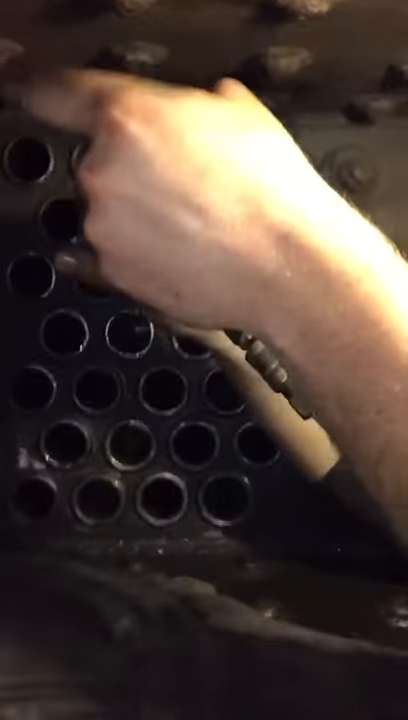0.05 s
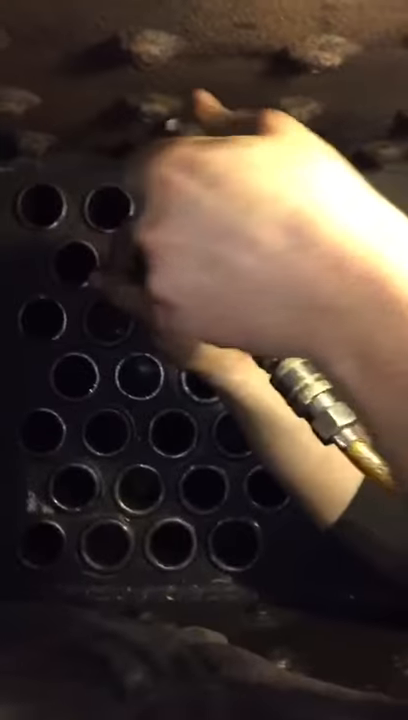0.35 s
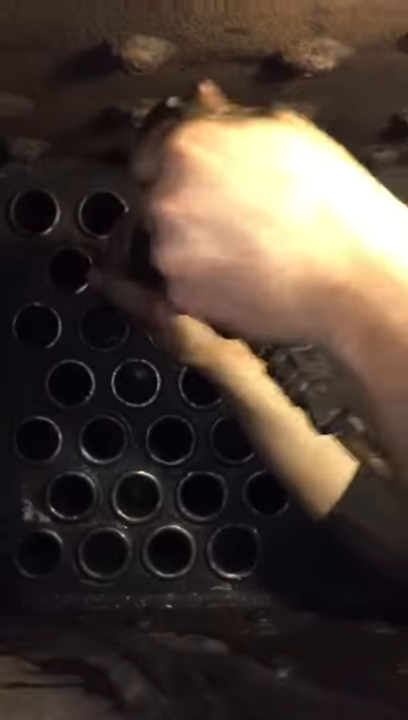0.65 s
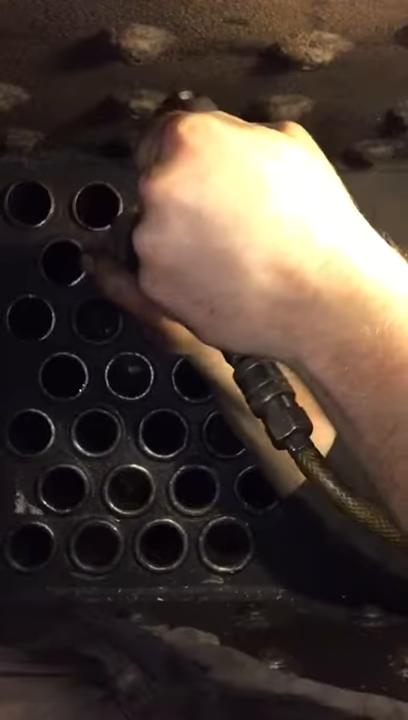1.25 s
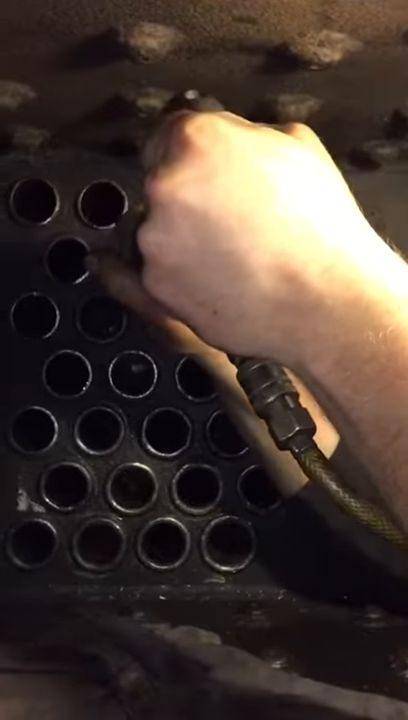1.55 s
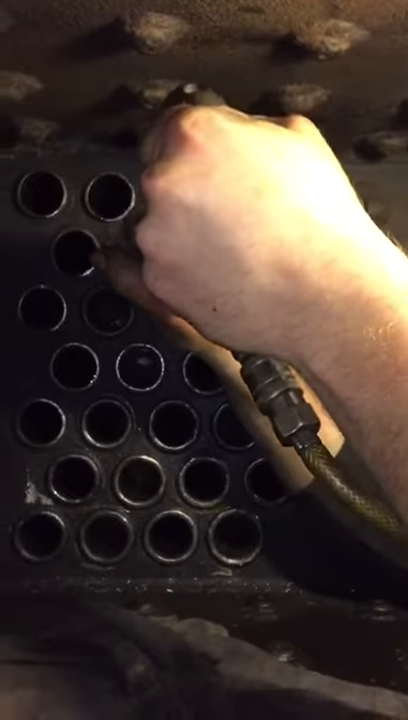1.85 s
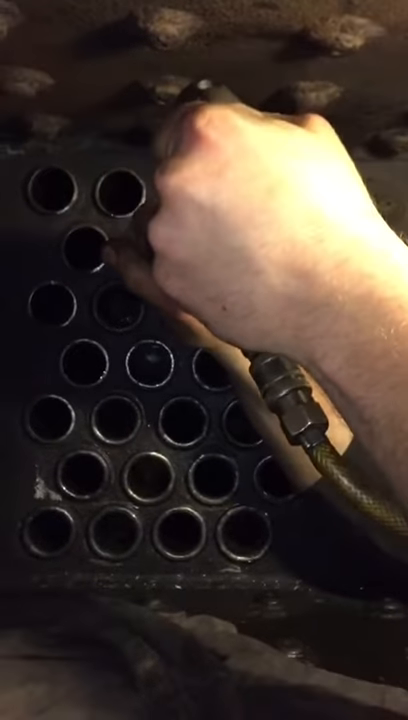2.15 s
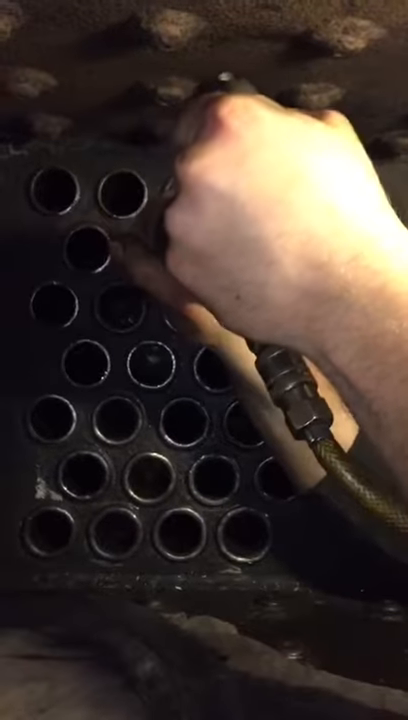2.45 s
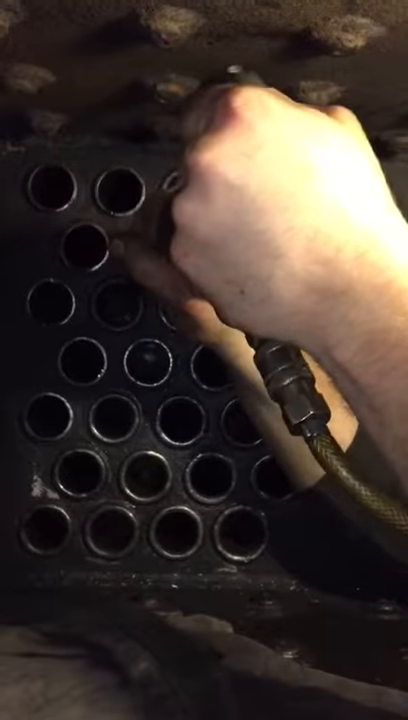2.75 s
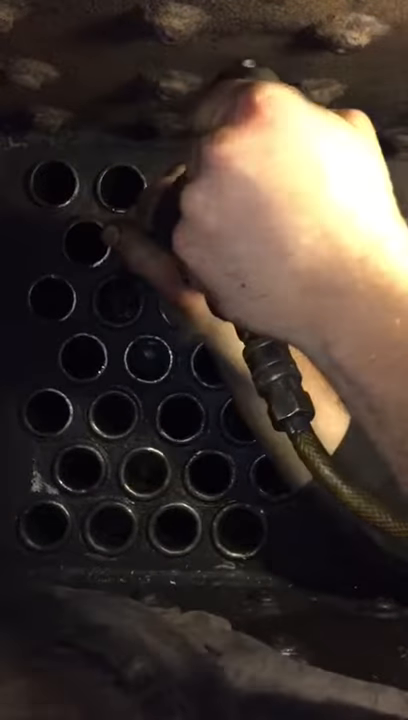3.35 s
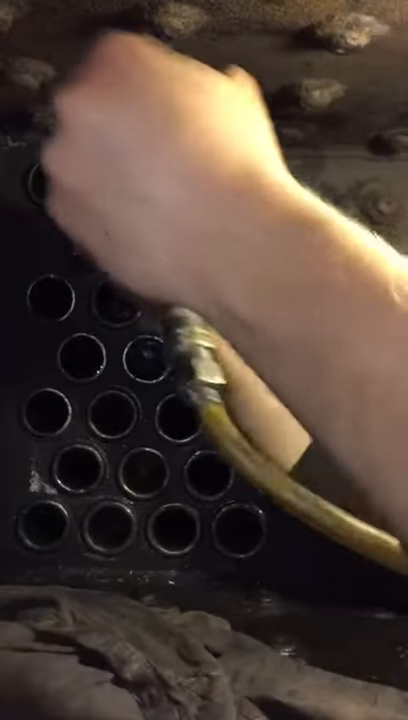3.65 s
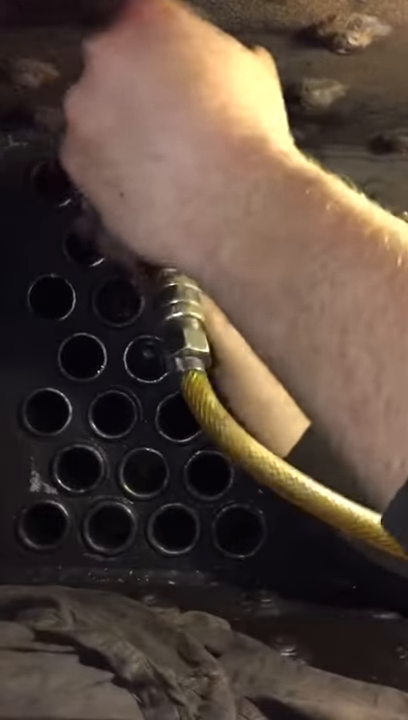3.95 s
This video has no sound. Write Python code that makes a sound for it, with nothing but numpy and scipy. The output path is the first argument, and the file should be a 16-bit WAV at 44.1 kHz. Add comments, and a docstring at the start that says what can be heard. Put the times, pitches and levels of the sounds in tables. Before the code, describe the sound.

A pneumatic hammer strikes a steel plate close by in a workshop. At first a compressor throbs and hisses, with a few light chisel ticks near 0.1 seconds. Air hisses at 1.7 seconds; the hammer stutters from 1.8, then builds to about thirty loud, ringing blows a second. It stops with a clink near 3.5 seconds, and the compressor's hum slowly comes back up.

```python
"""In a workshop, a hand-held pneumatic hammer drives its chisel against a steel tube plate, close by.
The loose chisel ticks as it is set on; the tool stutters, then runs up to about 30 blows a second,
each ringing chisel and plate while exhaust air hisses. A compressor throbs and hisses behind it.
Automatic gain control ducks the compressor under the hammering and slowly lets it back."""
import sys
import numpy as np
from scipy import signal
from scipy.fft import rfft, irfft
from scipy.io import wavfile
from scipy.ndimage import uniform_filter1d, map_coordinates

SR = 44100
rng = np.random.default_rng(int(sys.argv[2]) if len(sys.argv) > 2 else 0)


def dump(signal):
    """Clip the signal to [-1, 1] and save it as 16-bit WAV at the path in sys.argv[1]."""
    limited = np.clip(np.atleast_2d(signal).T, -1, 1)
    pcm = np.round(limited * 32767).astype(np.int16)
    wavfile.write(sys.argv[1], SR, pcm)


N = 176400
TIME_S = np.arange(N) / SR
AGE_S = np.arange(SR // 2) / SR  # time since an impact


def amp(db):
    """Decibels to gain."""
    return 10 ** (np.asarray(db) / 20)


def along(points, hz):
    """Interpolate (freq_hz, value) points on a log axis."""
    freq_hz, values = np.transpose(points)
    return np.interp(np.log(hz + 1), np.log(freq_hz + 1), values)


def wobble(rate_hz):
    """Smooth random curve, rate_hz knots a second."""
    return map_coordinates(rng.standard_normal(2000), [TIME_S * rate_hz + 2], mode="wrap")


def noise(spectrum, size=len(AGE_S)):
    """Coloured noise of rms 1."""
    gain = amp(along(spectrum, np.fft.rfftfreq(size, 1 / SR)))
    x = irfft(rfft(rng.standard_normal(size)) * gain, size)
    return x / x.std()


def fade(t60_s, attack_s):
    """Quick rise, exponential fall."""
    return np.exp(-np.log(1000) * AGE_S / t60_s) * (1 - np.exp(-AGE_S / attack_s))


def ring(modes, attack_s, scatter_db, detune, rough):
    """Modes struck once, level and pitch scattered; rough makes their phase wander."""
    out = np.zeros(len(AGE_S))
    for freq_hz, level_db, t60_s in modes:
        envelope = amp(level_db + scatter_db * rng.normal()) * fade(t60_s, attack_s)
        pitch_hz = freq_hz * (1 + detune * rng.normal())
        wander = rough * np.cumsum(rng.standard_normal(len(AGE_S))) / np.sqrt(SR)
        out += envelope * np.sin(2 * np.pi * (pitch_hz * AGE_S + wander))
    return out


def add(track, start_s, sound):
    """Mix a sound in at start_s."""
    part = track[round(start_s * SR):][:len(sound)]
    part += sound[:len(part)]


# room decay: freq_hz, t60_s
ROOM_DECAY = [(100, 0.48), (1000, 0.45), (2500, 0.56), (3800, 0.5), (5300, 0.38), (10000, 0.16)]

def workshop_reverb(x):
    """Diffuse reflections; the high treble dies first."""
    freq_hz, age_s, bands = signal.stft(rng.standard_normal(SR), SR, nperseg=256)
    decay = np.exp(-np.log(1000) * age_s / along(ROOM_DECAY, freq_hz)[:, None])
    tail = signal.istft(bands * decay, SR, nperseg=256)[1]
    return signal.fftconvolve(x, tail / np.linalg.norm(tail))[:N]


# hum lines: shaft_harmonic, level_db
HUM_LINES = [(4, -40), (6, -48), (8, -43), (12, -51), (14, -50), (16, -43), (18, -36), (20, -42), (22, -31),
             (24, -31), (26, -24), (28, -18), (29, -38), (30, -41), (31, -39), (32, -39), (33, -48),
             (34, -41), (35, -45), (36, -44), (38, -47), (40, -41), (42, -49), (44, -46), (50, -51),
             (54, -47), (55, -40), (56, -33), (57, -42), (58, -53), (60, -50), (83, -48), (84, -49),
             (113, -53)]
# rushing air: freq_hz, density_db
AIR_SPECTRUM = [(20, -41), (45, -6), (150, -9), (300, 1.5), (450, 7), (700, -2.5), (950, -4), (1500, -7),
                (2300, -14.5), (4000, -19.5), (5000, -28), (6300, -26), (7700, -28.5), (8400, -24.5),
                (10000, -30)]

def compressor(shaft_hz=16.15, casing_hz=440, casing_width_hz=18):
    """Shaft harmonics, delayed by the casing's resonance, beat into a throb over rushing air."""
    turns = shaft_hz * (TIME_S - .0205) + .0023 * wobble(3.42)
    hum = np.zeros(N)
    for harmonic, level_db in HUM_LINES:
        lag_rad = np.arctan((harmonic * shaft_hz - casing_hz) / casing_width_hz)
        scatter_rad = rng.normal() * np.interp(level_db, [-42, -34], [1.5, .1])
        envelope = np.sqrt(2) * amp(level_db + .62 * wobble(6.92))
        hum += envelope * np.sin(2 * np.pi * harmonic * turns - lag_rad + scatter_rad + .36 * wobble(4.95))
    ripple_db = .95 * np.cos(4 * np.pi * shaft_hz * turns)  # about 520 Hz
    air = amp(-31.5 + ripple_db + .31 * wobble(12)) * noise(AIR_SPECTRUM, N)
    return amp(-.11) * hum + air


# trigger valve airflow: time_s, level_db
VALVE_FLOW = [(1.66, -51), (1.725, -28), (1.775, -30.5), (1.85, -19.5), (1.98, -21), (2.3, -17.5),
              (3.44, -9.5), (3.48, -39), (3.6, -73)]
# exhaust hiss: freq_hz, density_db
EXHAUST_SPECTRUM = [(200, -4), (2000, 0.5), (3500, 0), (4600, 2.5), (5400, 4.5), (6200, 1), (6700, 3.5),
                    (7500, -7), (8500, -1.5), (10400, -11)]

def exhaust():
    """Air hisses out of the tool while the trigger is held."""
    level_db = np.interp(TIME_S, *np.transpose(VALVE_FLOW)) + wobble(60)
    return amp(level_db) * noise(EXHAUST_SPECTRUM, N)


# light taps: start_s, tick_db, ring_db, undamped_s
CHISEL_TAPS = [(0.1102, -15, -11.5, 0.012), (.1235, -8, -22, .012), (0.1457, -22, -22, .012),
               (.1585, -10, -31, 0.022), (1.7798, -13.5, -23, 0.0076), (1.802, -4, -8, 0.015),
               (3.468, -4, -1.5, 0.016)]
# tap noise: freq_hz, density_db
TICK_SPECTRUM = [(300, -21), (1600, -1.5), (2500, -5), (3750, 3.5), (4500, 0), (5300, -4.5), (6900, -3),
                 (8000, -20), (8800, -8.5), (9500, -2), (10400, -29.5)]
# tool body ringing free: freq_hz, level_db, t60_s
TOOL_BODY_MODES = [(3750, 4.5, 0.056), (5150, 0, 0.34), (9400, -2, 0.022)]

def chisel_taps():
    """The loose chisel ticks against the steel; the tool body, hanging free, rings briefly until damped."""
    out = np.zeros(N)
    for start_s, tick_db, ring_db, undamped_s in CHISEL_TAPS:
        tick = amp(tick_db - 4.5) * noise(TICK_SPECTRUM) * fade(t60_s=.061, attack_s=.00071)
        damping = np.exp(-np.maximum(AGE_S - undamped_s, 0) / .0025)
        clink = ring(TOOL_BODY_MODES, attack_s=.003, scatter_db=.7, detune=.002, rough=1.6)
        add(out, start_s, tick + amp(ring_db) * damping * clink)
    return out


def impact_noise(common, spectrum, shared_power=.15):
    """Fresh noise blended with a part common to all blows."""
    return np.sqrt(shared_power) * common + np.sqrt(1 - shared_power) * noise(spectrum)


# blows, relative levels: strike_s, crack_db, mid_db, bass_db, chisel_db, clank_hz
HAMMER_BLOWS = [(1.7959, 2, -9, -6.5, -8, 2060), (1.895, 1, -13.5, -9.5, -11.5, 2020),
                (1.9288, 2.5, -6, -20, -4.5, 1400), (1.9575, -20, -17, -14, -7.5, 1760),
                (2.0041, -1.5, -13.5, -11.5, -12, 2100), (2.0482, -0.5, -15, -14, -18.5, 2130),
                (2.0911, -4.5, -16.5, -15, -11, 2130), (2.1324, -2.5, -14.5, -15.5, -7.5, 620),
                (2.1696, -2, -13.5, -15.5, -9.5, 1370), (2.2079, 1, -13, -8.5, -18, 580),
                (2.243, -2, -14, -12.5, -7, 2140), (2.284, -0.5, -14, -5.5, -18, 1420),
                (2.3204, -4, -14, -16, -10.5, 590), (2.3569, -2, -14, -10.5, -10.5, 1244),
                (2.3935, -5, -16.5, -14, -9.5, 2030), (2.4286, -3.5, -15.5, -12.5, -17, 648),
                (2.4676, 1, -15, -11, -11, 890), (2.5022, 1, -13.5, -9.5, -8, 2166),
                (2.538, -2, -13, -10.5, -10, 620), (2.573, -0.5, -10.5, -17, -9, 672),
                (2.6101, 1, -10, -15, -14, 1750), (2.6418, 0, -10.5, -20, -23, 1030),
                (2.6764, 1.5, -7, -11, -15, 1065), (2.7111, 0, -10.5, -24, -12, 1186),
                (2.7451, 1, -12, -22, -15, 643), (2.78, 0.5, -11, -37, -17, 673),
                (2.8153, 1, -7.5, -10.5, -10, 740), (2.8478, -0.5, -9.5, -34, -27, 1840),
                (2.882, 2, -10, -17.5, -12, 835), (2.9146, 2, -7, -25, -19, 765),
                (2.9486, 3, -11.5, -12, -13, 1990), (2.98, 0, -11.5, -19, -16, 890),
                (3.015, -5, -9.5, -20, -20, 1870), (3.0476, -0.5, -10, -10.5, -12, 866),
                (3.0825, -2.5, -9.5, -31, -15, 1530), (3.1142, 0, -9.5, -14.5, -10, 1780),
                (3.1481, 0.5, -7, -21, -18, 1440), (3.1821, 2, -12, -12, -7, 1840),
                (3.216, 0, -6, -16, -22, 1117), (3.2484, 3, -10, -18.5, -18, 680),
                (3.2851, 1, -9, -14, -21, 890), (3.3196, -1.5, -9.5, -23, -22, 667),
                (3.3546, 1, -8, -16, -22, 1536), (3.3895, 0.5, -7, -16.5, -18, 1083),
                (3.4235, 6, -8, -14.5, -19, 638), (3.4607, 0, -14, -13, -12.5, 1373)]
# level of the blows going into the gain control: time_s, gain_db
BLOW_DRIVE = [(1.8, 4), (1.93, 5), (2.1, 8.5), (2.4, 13), (2.8, 12.5), (3.45, 12.5)]
# contact crack: freq_hz, density_db
CRACK_SPECTRUM = [(300, -21), (1500, -12.5), (2700, -5.5), (3700, -6.5), (4500, -6.5), (5300, -6),
                  (6800, -1), (7900, -12.5), (8700, -4.5), (9500, -2), (10500, -16.5)]
# plate clang: freq_hz, density_db
CLANG_SPECTRUM = [(150, -1.5), (400, -1), (700, 0.5), (1000, -1.5), (1500, -0.5), (2100, -2.5), (2600, -6),
                  (3400, -2), (4400, -5.5), (6500, -11), (10000, -23)]
# low thud: freq_hz, density_db
THUD_SPECTRUM = [(20, -37), (38, -22), (55, -2.5), (110, 0), (200, -2), (400, -11), (900, -12), (4000, -60)]
# plate boom: freq_hz, level_db, t60_s
PLATE_MODES = [(61.4, -4.5, 0.17), (93.7, -4, 0.41), (132.7, -4.5, 0.42)]
# chisel ring: freq_hz, level_db, t60_s
CHISEL_MODES = [(2096, -15.5, 0.093), (3530, -11.5, 0.045), (3718, 0.5, 0.047), (3836, -1.5, 0.029),
                (3990, -5.5, .03), (4520, -16.5, .05), (5060, -13.5, 0.14), (5570, -15.5, 0.11),
                (7000, -12, 0.028), (8550, -12.5, 0.032), (9010, -12, 0.018)]

def hammer(bite_s=2.45, bite_rise_s=.08, contact_lead_s=.0026, recoil_s=.016):
    """Each blow cracks, rings chisel and plate, and kicks the chisel back against its retainer."""
    out = np.zeros(N)
    common_crack, common_clang = noise(CRACK_SPECTRUM), noise(CLANG_SPECTRUM)
    for strike_s, crack_db, mid_db, bass_db, chisel_db, clank_hz in HAMMER_BLOWS:
        bite = .5 + .5 * np.tanh((strike_s - bite_s) / bite_rise_s)  # chisel digs in, rings less
        drive = amp(np.interp(strike_s, *np.transpose(BLOW_DRIVE)))
        crack = impact_noise(common_crack, CRACK_SPECTRUM) * fade(t60_s=.04, attack_s=.0025)
        clang = impact_noise(common_clang, CLANG_SPECTRUM) * fade(t60_s=.077, attack_s=.0029)
        thud = noise(THUD_SPECTRUM) * fade(t60_s=.097, attack_s=.00086)
        boom = ring(PLATE_MODES, attack_s=.005, scatter_db=5, detune=.0021, rough=.49)
        chisel = ring(CHISEL_MODES, attack_s=.0011, scatter_db=3.5, detune=.012, rough=1.94)
        clank = ring([(clank_hz, 0, .07)], attack_s=.0024, scatter_db=2, detune=.0055, rough=2.3)
        recoil_db = crack_db - 13 + 2 * rng.normal()
        recoil = amp(recoil_db) * noise(CRACK_SPECTRUM) * fade(t60_s=.023, attack_s=.0006)
        contact = (amp(crack_db - 4 - 3.3 * bite) * crack
                   + amp(mid_db + 5.5) * clang
                   + amp(mid_db - 4.5 + 4 * bite) * clank
                   + amp(bass_db + 1.6 * bite) * thud
                   + amp(bass_db - 2 - 6.2 * bite) * boom)
        add(out, strike_s - contact_lead_s, drive * contact)
        add(out, strike_s + .0012, drive * amp(chisel_db + 5.5 - 6.3 * bite) * chisel)
        add(out, strike_s + recoil_s + .003 * rng.normal(), drive * recoil)
    return out


def scene():
    """The tool close by, its reverberation, and the compressor."""
    tool, taps = hammer() + exhaust(), chisel_taps()
    reverb = workshop_reverb(amp(-14) * tool + amp(-22) * taps)
    return (tool + taps + reverb + compressor())[None]


def gain_control(x, target_db, attack_s, release_db_per_s, hop=128):
    """Turns down quickly above the target level, then creeps back up."""
    level_db = 10 * np.log10(np.abs(uniform_filter1d(x ** 2, hop * 10)) + 1e-12)[::hop]
    cut_db, cuts_db, step_s = 0, [], hop / SR
    for over_db in level_db - target_db:
        if over_db > cut_db:
            cut_db += (over_db - cut_db) * min(step_s / attack_s, 1)
        else:
            cut_db = max(cut_db - release_db_per_s * step_s, 0)
        cuts_db.append(cut_db)
    return x * amp(-np.interp(TIME_S, TIME_S[::hop], cuts_db))


def record(dry):
    """Low cut, gain control, soft clip at full scale, steep high cut."""
    low_cut_hz, high_cut_hz = 36, 10450
    x = signal.sosfilt(signal.butter(2, low_cut_hz, "high", fs=SR, output="sos"), dry[0])
    x = gain_control(x, target_db=-13, attack_s=.064, release_db_per_s=18.5)
    x = x / (1 + np.abs(x) ** 6) ** (1 / 6)
    passband = 1 / np.sqrt(1 + (np.fft.rfftfreq(2 * N, 1 / SR) / high_cut_hz) ** 240)
    return irfft(rfft(x, 2 * N) * passband)[None, :N]


dry = scene()
out = record(dry)
dump(out)
```